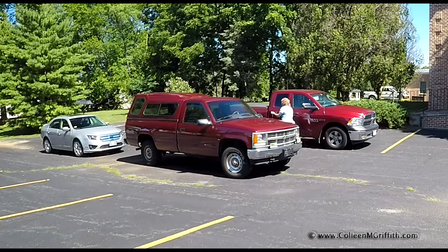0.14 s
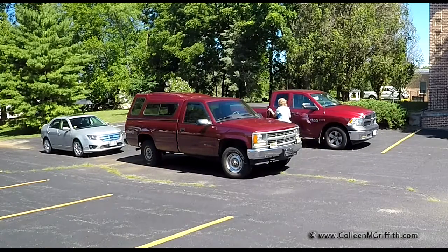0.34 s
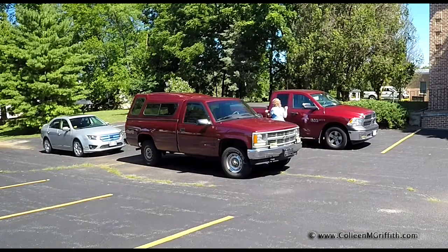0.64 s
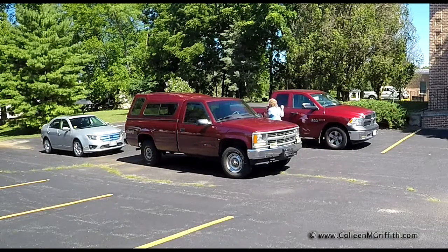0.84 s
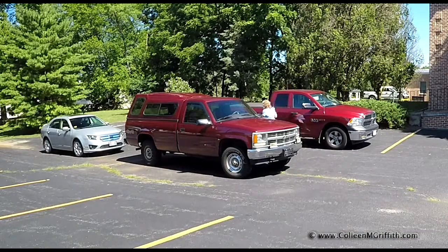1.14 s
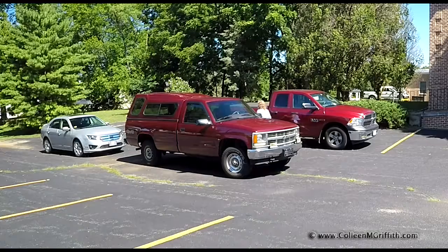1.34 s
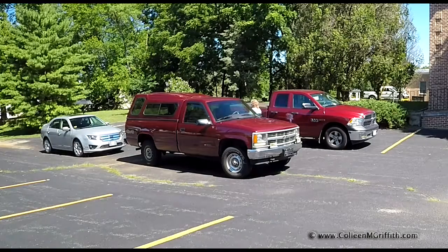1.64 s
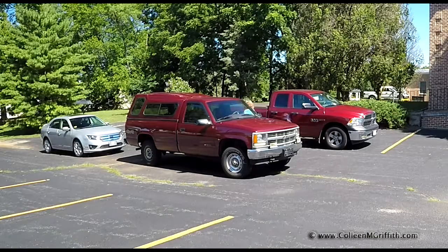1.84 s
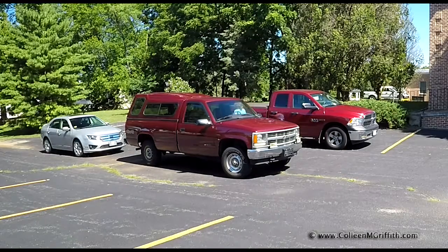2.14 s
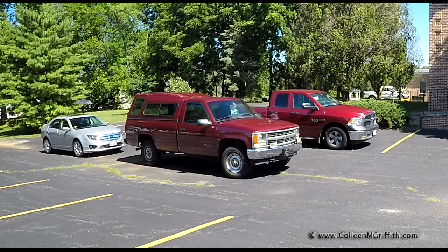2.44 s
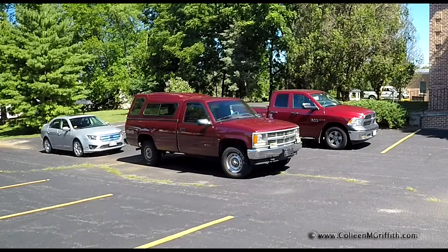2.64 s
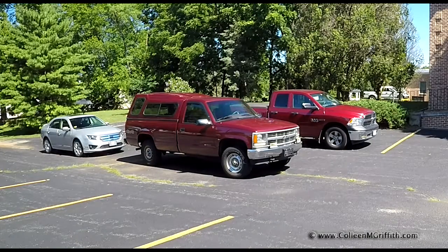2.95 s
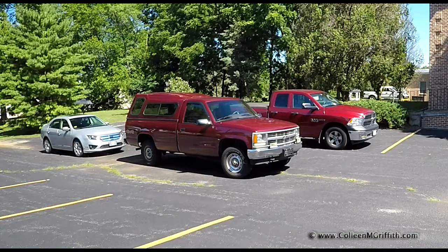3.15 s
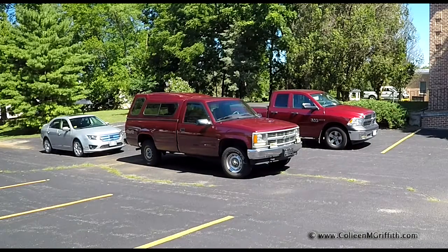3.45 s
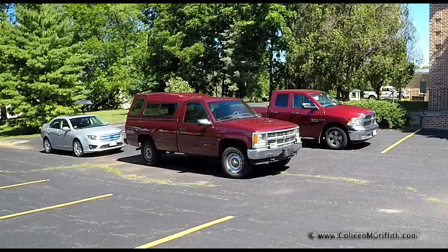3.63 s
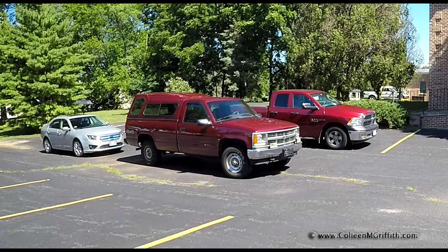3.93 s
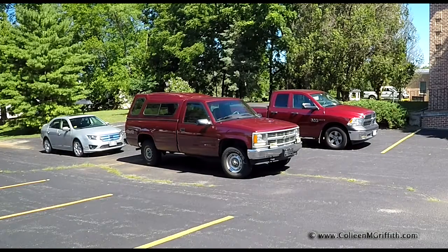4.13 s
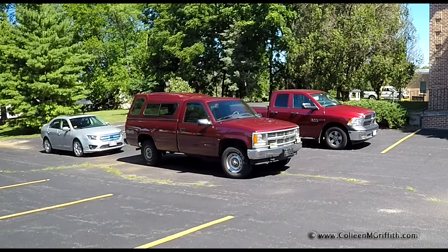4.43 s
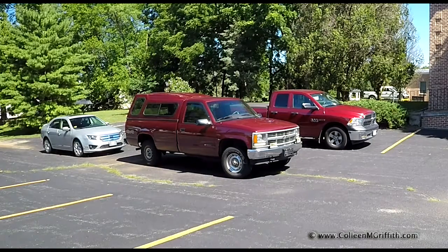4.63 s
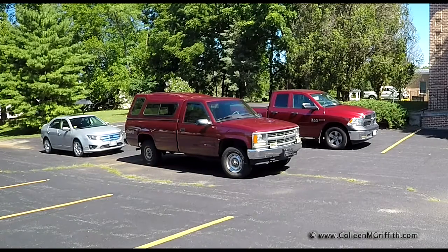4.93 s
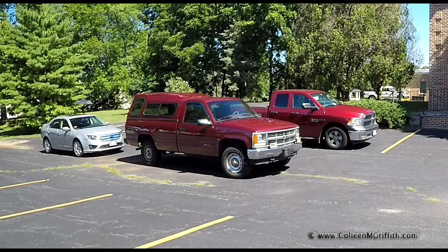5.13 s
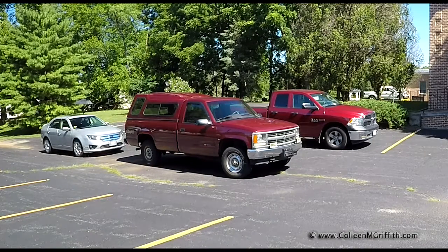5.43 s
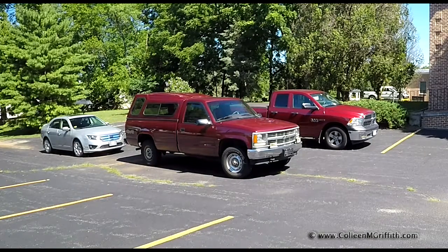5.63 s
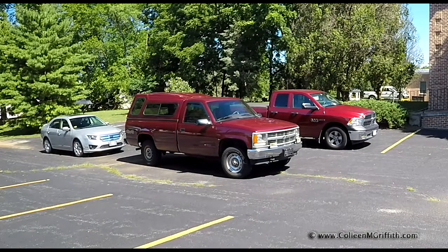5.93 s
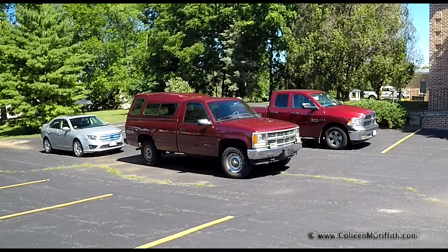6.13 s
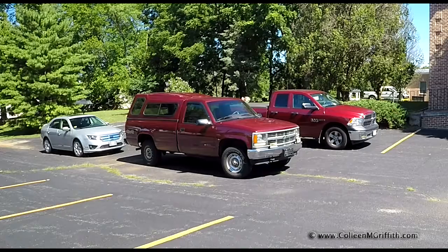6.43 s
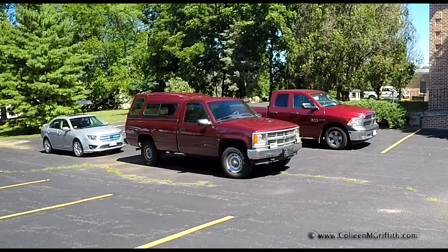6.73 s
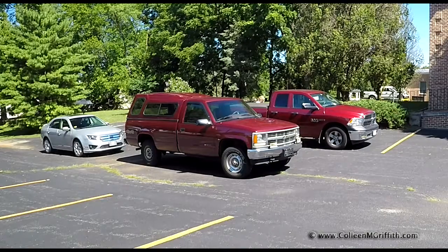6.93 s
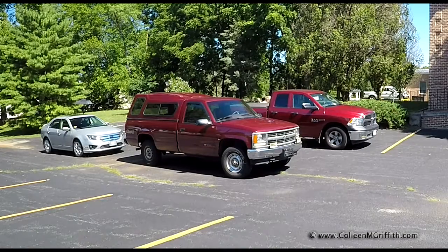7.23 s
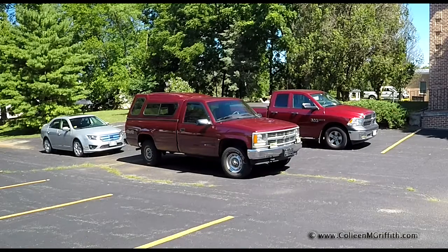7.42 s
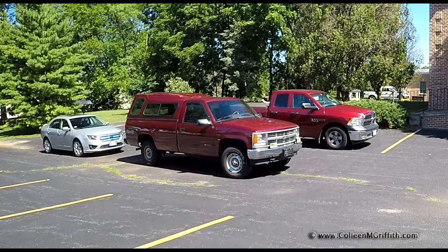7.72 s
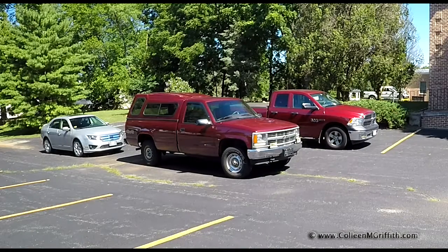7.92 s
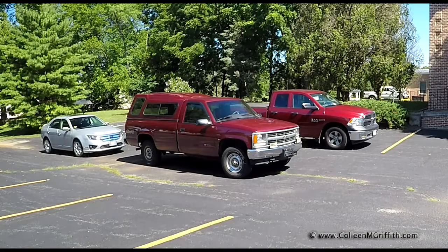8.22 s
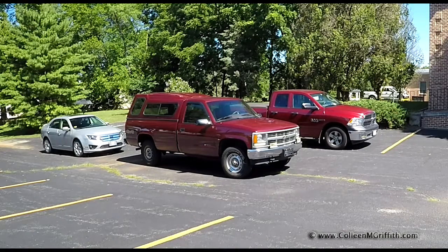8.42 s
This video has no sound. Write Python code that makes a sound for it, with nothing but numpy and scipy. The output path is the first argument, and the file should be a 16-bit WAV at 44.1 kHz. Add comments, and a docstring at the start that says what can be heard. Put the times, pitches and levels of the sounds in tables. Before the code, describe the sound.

A sunny parking lot heard in stereo from a camera, with steady soft hiss and a barely audible high whine on the right. Throughout, muffled traffic roars beyond the trees and an engine idles faintly with a fluttering low hum. Deep rumble is strong at 0.3 s, sinks by 3 s while far motors glide in low drones, then swells again to about 6 s. Nearby sparrows give short, sharp, zigzag chirps at 0.3, 1.2 and 1.9 s, then busier trilled and raspy groups at 3.2-3.6, 4.3, 5.2-5.5, 5.8-6 and 7.2 s, slightly left, with brief echoes. From about 5 s a vehicle's low exhaust note climbs unevenly, dropping in pitch after 6.9 s and fading after 7.3 s. Soft husky rising whistles come from distant birds at 6 and 7 s. Traffic rumble continues to the end at 8.6 s.

```python
"""A sunny parking lot, in stereo: an engine idles across the lot (orders of its firing rate) under camera hiss and whine.
From the start, traffic beyond the trees (shaped noise) rumbles, fades by 3 s and swells again, with gliding far motors.
Sparrows chirp nearby from 0.3 s on (zigzag whistles); parked cars, a brick wall and the trees throw the chirps back.
From about 5 s the exhaust note of a vehicle climbs, sinking after 6.9 s as its driver eases off.
Between 6 and 7.3 s soft husky whistles rise from birds far in the trees."""
import sys
import numpy as np
from scipy import signal
from scipy.fft import rfft, irfft
from scipy.io import wavfile
from scipy.ndimage import uniform_filter1d

SR = 44100
rng = np.random.default_rng(int(sys.argv[2]) if len(sys.argv) > 2 else 0)


def waveform_to_disk(signal):
    """Save audio, clipped to [-1, 1], as 16-bit WAV at the path in sys.argv[1]."""
    frames = np.transpose(np.atleast_2d(signal))
    scaled = np.clip(frames, -1, 1) * 32767
    samples = np.round(scaled).astype(np.int16)
    wavfile.write(sys.argv[1], SR, samples)


N = 377923
TIME = np.arange(N) / SR


def amp(db):
    """Decibels to gain."""
    return 10 ** (np.asarray(db) / 20)


def evened(x):
    """Scales to rms 1."""
    return x / np.sqrt(np.mean(x ** 2) + 1e-20)


def read(points, hz):
    """A table over frequency, joined on a log-frequency axis."""
    f, value = np.transpose(points)
    return np.interp(np.log(hz + 1), np.log(f), value)


def curve(rows, t=TIME):
    """The columns of a table, joined in time."""
    s, *columns = np.transpose(rows)
    return [np.interp(t, np.sort(s), c) for c in columns]


def drift(rate_hz):
    """Random wander of rms 1, its spectrum a bell that falls away above the rate."""
    hz = np.fft.rfftfreq(N, 1 / SR)
    return evened(irfft(rfft(rng.standard_normal(N)) * np.exp(-(hz / rate_hz) ** 2), N))


def tone(hz):
    """A sine of rms 1 that follows a pitch curve."""
    return np.sqrt(2) * np.sin(2 * np.pi * (np.cumsum(hz) / SR + rng.random()))


def glide(start_s, length_s, hz0, hz1):
    """A straight pitch glide and its arched gain, which is zero at both ends."""
    u = np.clip((TIME - start_s) / length_s, 0, 1)
    return hz0 + (hz1 - hz0) * u, np.sqrt(4 * u * (1 - u))


def pan(x, lean_db):
    """Places a sound between the two microphones by level, left minus right."""
    return x * amp(np.array([[lean_db], [-lean_db]]) / 2)


def scatter(delay_s, t60_s):
    """Sparse echoes of energy 1 that arrive after a delay and die away, different at each microphone."""
    t = np.arange(SR) / SR
    echoes_per_s = 2500
    hits = rng.random((2, SR)) < echoes_per_s / SR
    taps = rng.standard_normal((2, SR)) * hits * amp(-60 * t / t60_s) * (t > delay_s)
    return taps / np.linalg.norm(taps, axis=1, keepdims=True)


def add(mix, s, sound):
    """Mixes a stereo sound in at a time."""
    part = mix[:, round(s * SR):][:, :sound.shape[1]]
    part += sound[:, :part.shape[1]]


# likeness of the two microphones: (frequency [Hz], left-right likeness [-1 to 1])
LIKENESS = [(60, 1), (150, 0.98), (300, 0.97), (600, 0.89), (800, -0.064), (1100, -0.56), (1600, -0.32),
            (2400, -0.17), (3200, 0.53), (6000, -0.11), (14000, -0.061)]
# balance of the two microphones: (frequency [Hz], left minus right [dB])
LEAN = [(60, -0.5), (150, -0.5), (280, -2), (420, -3), (560, -7), (700, -12.5), (900, -5.5), (1300, -1.5),
        (2300, 0), (5500, 1.5), (9500, -2), (14000, 0)]
# sound that reaches the left microphone first: (frequency [Hz], share a quarter cycle ahead on the left)
LEAD = [(450, 0), (900, 0.26), (2000, 0.56), (3500, 0)]


def air_noise(spectrum, patchy_db):
    """Stereo noise, its mono mix of rms 1, whose colour shifts in small patches as the air moves."""
    hz = np.fft.rfftfreq(4096, 1 / SR)
    a, b, c, d, patches = rng.standard_normal((5, N // 1024 + 5, len(hz)))
    patches = uniform_filter1d(patches, size=5, axis=0)  # over time
    patches = evened(uniform_filter1d(patches, size=24, axis=1))  # over frequency
    same = np.clip(read(LIKENESS, hz), -.999, .999)
    lean = amp(read(LEAN, hz) / 2)
    left = a + 1j * b
    shared = same - 1j * read(LEAD, hz)
    own = np.sqrt(np.maximum(1 - abs(shared) ** 2, 0))
    right = shared * left + own * (c + 1j * d)
    # keeps the mono mix on the spectrum whatever the lean and likeness
    centre = np.sqrt(lean ** 2 + lean ** -2 + 2 * same)
    colour = amp(read(spectrum, hz) + patchy_db * patches)
    z = np.array([left * lean, right / lean]) / centre * colour
    x = signal.istft(z.transpose(0, 2, 1), nperseg=4096, noverlap=3072)[1][:, :N]
    return x / x.mean(0).std()


# colour of the microphone hiss: (frequency [Hz], relative level [dB per Hz])
HISS = [(100, -10), (2000, 3), (3400, 3.5), (5000, -0.5), (7700, 0), (8100, -0.5), (10000, -2), (11500, -8),
        (13000, -11.5), (14500, -20)]


def camera_hiss(level_db=-61.5):
    """Steady hiss of the microphones, with a patchy colour."""
    return amp(level_db) * air_noise(HISS, patchy_db=2.0)


def camera_whine(whine_hz=8545, level_db=-77.0, lean_db=-21.0):
    """Electronic whine, mostly on the right: a narrow noise band pulsing with the frame rate, and a steady line."""
    frame_hz, width_hz = 59.94, 70
    line_hz, line_share = 8631, .34
    hz = np.fft.rfftfreq(N, 1 / SR)
    resonance = 1 / (1 + ((hz - whine_hz) / width_hz) ** 2)
    band = evened(irfft(rfft(rng.standard_normal(N)) * resonance, N))
    turn = 2 * np.pi * frame_hz * TIME
    beat = 1 + .6 * np.cos(turn) + .3 * np.cos(turn / 2) + .15 * np.cos(3 * turn)
    whine = evened(band * beat) + line_share * tone(np.full(N, line_hz))
    return pan(amp(level_db) * whine, lean_db)


# colour of the traffic roar: (frequency [Hz], relative level [dB per Hz])
ROAR = [(60, -36), (150, -4), (250, -0.5), (340, -1.5), (420, -0.5), (520, -0.5), (620, -2.5), (730, -11),
        (950, -20), (1250, -24.5), (1800, -31), (2600, -40.5), (5000, -55), (15000, -72)]


def roar(level_db=-38):
    """Steady roar of the traffic beyond the trees: broad, patchy noise."""
    return amp(level_db) * air_noise(ROAR, patchy_db=1.4)


# level of the upper part of the tyre roar: (time [s], level [dB])
TYRES_DB = [(0, -54), (1.3, -53.5), (2.5, -52), (4, -50), (6.2, -49.5), (8.57, -50)]
# its colour: (frequency [Hz], relative level [dB per Hz])
TYRES = [(300, -40), (600, 1), (750, 0.5), (950, -3.5), (1300, -14), (2000, -20), (3000, -34), (8000, -65)]


def tyres():
    """Upper part of the tyre roar: noise that slowly gains level, brightening the traffic."""
    return air_noise(TYRES, patchy_db=1.14) * amp(curve(TYRES_DB)[0])


# brief surges in the traffic: (time of the peak [s], length [s], centre [Hz], peak level [dB])
SURGES = [(.35, .15, 600, -44), (3.91, .11, 530, -40.5), (4.3, .8, 260, -42), (5.07, .08, 700, -44),
          (6, .7, 112, -37), (7.26, .36, 520, -42.5)]
# colour of every surge: (multiple of its centre, relative level [dB per Hz])
SURGE = [(.5, -49), (.75, -1), (1, 9), (1.35, -18), (3.3, -60)]


def surges():
    """Brief surges in the traffic: bands of noise under bell-shaped swells."""
    out = np.zeros((2, N))
    for s, length, centre_hz, db in SURGES:
        spectrum = [(k * centre_hz, d) for k, d in SURGE]
        swell = np.exp(-((TIME - s) / (length / 2)) ** 2)
        out += amp(db) * swell * air_noise(spectrum, patchy_db=0)
    return out


# swell of the deep traffic rumble, before the trim in rumble(): (time [s], level [dB])
RUMBLE_DB = [(0, -35.5), (0.3, -28), (1.1, -33.5), (2, -42), (3.05, -50.5), (3.6, -39), (4.5, -34),
             (5.9, -31), (7.45, -37), (7.95, -31), (8.57, -33.5)]
# its colour: (frequency [Hz], relative level [dB per Hz])
RUMBLE = [(12, -11), (25, -5), (40, -4.5), (58, 1), (75, -3.5), (100, -4.5), (130, 0), (200, -12),
          (400, -63), (1500, -110)]
# engine hums that swell with it: (frequency [Hz], level relative to the rumble [dB])
RUMBLE_HUMS = [(58.5, -6), (100, -8)]


def rumble(trim_db=-2.0, hum_wander=0.012):
    """Deep traffic rumble: low noise that swells and fades, taking wavering engine hums along."""
    sound = air_noise(RUMBLE, patchy_db=0.0)
    for hz, db in RUMBLE_HUMS:
        gain = amp(db + 2 * drift(5.3))
        sound += pan(gain * tone(hz * (1 + hum_wander * drift(7.3))), read(LEAN, hz))
    return sound * amp(curve(RUMBLE_DB)[0] + trim_db)


# drones of far motors, before the trim in drones(): (start [s], end [s], start [Hz], end [Hz], level [dB])
DRONES = [(-0.5, 0.904, 87, 84.1, -30), (-1.5, 1.884, 148, 140.5, -32.5), (0.05, 1.87, 170, 167.2, -39),
          (1.63, 2.25, 450, 370, -43), (2.5, 2.76, 405, 402, -42.5), (1.5, 3.2, 169.2, 164, -36.5),
          (2.5, 3.06, 473, 477, -41.5), (2, 2.9, 580, 505, -53), (4.5, 5.8, 33, 36, -37.5),
          (5.5, 6.5, 37.2, 25.3, -41)]


def drones(trim_db=-1):
    """Far motors drift in and out of hearing, each a tone that glides a little."""
    out = np.zeros((2, N))
    for start, end, hz0, hz1, db in DRONES:
        hz, swell = glide(start, end - start, hz0, hz1)
        swell = swell * amp(db + trim_db + 1.5 * drift(4))
        out += pan(swell * tone(hz * (1 + .003 * drift(5))), read(LEAN, hz0))
    return out


# loudness of the vehicle's exhaust note: (time [s], level [dB])
EXHAUST_DB = [(4.75, -54.5), (5.1, -35.5), (5.45, -28), (5.83, -36.5), (5.9, -25), (6.14, -27.5),
              (6.19, -34), (6.26, -27), (6.55, -30.5), (6.78, -34), (7.03, -32), (7.12, -44.5),
              (7.175, -25), (7.27, -24), (7.55, -31.5), (7.8, -40.5), (8.0, -37), (8.57, -48)]


def exhaust(wander=0.0036, flutter_db=1.5, approach_db_per_s=55):
    """Firing note of a moving vehicle: it climbs under load and sinks when the driver eases off."""
    ease_s, top_hz, climb_hz_per_s = 6.94, 158.6, 7.2
    coast_hz, settle_s = 125.2, .8
    since = TIME - ease_s
    pull_hz = top_hz + climb_hz_per_s * since
    sink_hz = coast_hz + (top_hz - coast_hz) * np.exp(-abs(since) / settle_s)
    hz = np.where(since < 0, pull_hz, sink_hz)
    # rises steadily out of silence up to the first row of the table
    db = curve(EXHAUST_DB)[0] - approach_db_per_s * np.maximum(EXHAUST_DB[0][0] - TIME, 0)
    gain = amp(db + flutter_db * drift(14.0))
    return pan(gain * tone(hz * (1 + wander * drift(28.0))), -0.8)


# colour of the exhaust boom: (frequency [Hz], relative level [dB per Hz])
BOOM = [(60, -49), (105, -14), (130, -0.5), (155, 7), (185, 3), (220, 0), (280, -17), (500, -56),
        (1500, -110)]


def boom(level_db=-36, with_rumble=0.097, with_exhaust=0.1):
    """Exhaust boom: low noise that follows a share of the dB swing of the rumble and of the exhaust note."""
    rumble_db, note_db = curve(RUMBLE_DB)[0], curve(EXHAUST_DB)[0]
    swing_db = with_rumble * (rumble_db - rumble_db.mean())
    swing_db += with_exhaust * (note_db - note_db.mean())
    return air_noise(BOOM, patchy_db=1.0) * amp(level_db + swing_db)


# orders of the idling engine: (multiple of the firing rate, level [dB])
IDLE_ORDERS = [(2, -55.5), (3, -48), (4, -44.8), (5, -48.5), (6, -57.5), (8, -52), (9, -58)]


def idle(firing_hz=59.44, wander=0.00402, flutter_db=3.0):
    """Idling engine: orders of a wandering firing rate; each flutters on its way across the lot."""
    speed = firing_hz * (1 + wander * drift(2.78))
    out = np.zeros((2, N))
    for k, db in IDLE_ORDERS:
        gain = amp(db + flutter_db * drift(5.8))
        out += pan(gain * tone(round(k) * speed), read(LEAN, k * firing_hz))
    return out


# whistles far in the trees, before lot(): (time [s], length [s], start [Hz], end [Hz], level [dB])
WHISTLES = [(6.02, .16, 2380, 2520, -67), (6.975, .03, 3130, 3310, -65), (7.017, 0.068, 3140, 3410, -61.5),
            (7.072, 0.13, 3390, 3500, -59), (7.152, .093, 2730, 2790, -63)]


def far_birds(lean_db=-1.0):
    """Soft rising whistles from deep in the trees, made husky by a fast random quiver in pitch."""
    out = np.zeros(N)
    quiver = 1 + .042 * drift(350)
    for s, length, start_hz, end_hz, db in WHISTLES:
        hz, swell = glide(s, length, start_hz, end_hz)
        out += amp(db) * swell * tone(hz * quiver)
    return pan(out, lean_db)


# the kinds of note that the sparrows string into calls:
# (time into the note [s], pitch before the call's factor [Hz], level relative to the call [dB])
CHEEP = [(0, 3080, -10), (.006, 3550, -12), (.013, 4330, -11.5), (.03, 4430, -9), (.035, 3600, -9.5),
         (.042, 3430, -1), (.048, 4450, -6.5), (.053, 3900, -6), (.058, 3050, -10), (.068, 3080, -8),
         (.077, 3330, 2.5), (.084, 3580, -1), (.089, 3180, -1.5), (.096, 2800, -11)]
CHURP = [(0, 2890, -19), (.009, 3444, -8), (.014, 4200, 0.5), (.019, 4440, -1), (.037, 4390, -6),
         (.045, 4050, -0.5), (.052, 3150, -6)]
SWEEP = [(0, 2920, -4), (.007, 3514, 2), (.015, 4400, -2), (.021, 4754, 2), (.032, 4720, -5.5),
         (.038, 3340, 5.5), (.043, 3050, -9)]
PIP = [(0, 3020, -6), (.008, 3130, -3.5), (.018, 3544, 2), (.025, 3800, -4.5), (.034, 3140, -3)]
BUZZ = [(0, 5100, -7), (.012, 5390, -8.5), (.02, 5650, -4.5), (.026, 5870, -7)]
# the calls, before lot(): (time [s], note, pitch factor, level [dB], strain [0 has no trill or rasp],
# left minus right [dB], share of the energy scattered by leaves)
CHIRPS = [(.273, CHEEP, 1.005, -47.5, .15, 3, .45), (1.153, CHURP, 1, -55, .6, 6, .4),
          (1.213, BUZZ, 0.84, -58, 0.98, 4, .6), (1.24, PIP, 1, -56, 0.64, 0, .4),
          (1.254, SWEEP, 0.86, -59.5, 0.7, 2, 0.32), (1.9, CHEEP, 1.005, -46.5, 0.12, 3, .5),
          (3.227, CHURP, .95, -58.5, 0.78, 5, 0.48), (3.268, PIP, 0.95, -57, 0.62, -3, 0.84),
          (3.29, BUZZ, 1, -58, 0.69, 7, 0.66), (3.316, SWEEP, 0.97, -57, 0.52, 8, 0.7),
          (3.335, PIP, 0.98, -53.5, 0.43, 1, .6), (3.378, PIP, 0.95, -56.5, 0.48, 0, 0.54),
          (3.563, BUZZ, 1.03, -57.5, .7, 13, 0.27), (3.584, CHEEP, 1, -43.5, .18, 3, .3),
          (4.307, CHURP, 0.96, -52.5, 0.59, 6, 0.39), (4.368, BUZZ, 0.99, -55, .4, 14, .35),
          (4.394, SWEEP, .93, -52, 0.28, 2, 0.27), (4.463, PIP, 0.99, -59.5, .3, -1, .4),
          (5.174, BUZZ, 1.02, -59, 0.53, 17, 0.36), (5.199, CHEEP, 1.01, -44, .15, 4, .1),
          (5.284, BUZZ, 1.04, -53, .7, 16, 0.14), (5.312, CHURP, 1.02, -45, .6, 7, 0.11),
          (5.372, BUZZ, 1, -52, .9, 11, .4), (5.396, SWEEP, 0.97, -49.5, .45, 2, .15),
          (5.464, PIP, 0.99, -49, .35, 0, .12), (5.812, BUZZ, 1, -56.5, .7, 14, .3),
          (5.837, CHURP, 1.01, -48, 0.58, 6, .15), (5.89, PIP, .98, -55, 0.37, 2, .5),
          (5.9, BUZZ, .95, -54, .7, 11, 0.45), (5.924, SWEEP, 1.03, -51.5, 0.35, 5, .12),
          (5.995, PIP, .95, -53, .4, -2, 0.37), (7.178, CHURP, .985, -54, 0.53, 9, 0.64),
          (7.225, BUZZ, 0.94, -55, 1.4, 12, 0.52), (7.228, SWEEP, 0.87, -55, 0.84, 4, .7),
          (7.25, CHEEP, 0.98, -44, .4, 2, .25), (7.252, BUZZ, .95, -59, 1.1, 7, .6)]


def sparrows(flutter_db=2.0, rasp_hz=230, leaves_t60_s=0.12):
    """Each note is a whistle zigzagging in pitch; a fast trill and a rasp shake it, and nearby leaves blur it."""
    trill_hz, trill_swing_hz, trill_depth = 371.4, 280, 0.56
    edge_s = .002  # every note starts and stops abruptly
    out = np.zeros((2, N))
    trill = tone(trill_hz * (1 + 0.0986 * drift(38.2))) / np.sqrt(2)
    shake_hz = trill_swing_hz * trill + rasp_hz * drift(500)
    quiver = 1 + .014 * drift(250)
    flutter = amp(flutter_db * drift(90))
    for s, note, pitch, db, strain, lean_db, hidden in CHIRPS:
        t = np.arange(0, note[-1][0], 1 / SR)
        hz, note_db = curve(note, t)
        at = round(s * SR) + np.arange(len(t))
        edges = np.minimum(np.minimum(t, t[-1] - t) / edge_s, 1)
        # strain trills pitch and loudness together
        whistle = tone(hz * pitch * quiver[at] + strain * shake_hz[at])
        voice = evened(whistle * (1 + min(trill_depth * strain, 1) * trill[at]))
        voice = edges * amp(db + note_db) * flutter[at] * voice
        hidden = np.clip(hidden, 0, 1)
        leaves = np.sqrt(hidden) * scatter(.001, leaves_t60_s)[0, :SR // 10]
        leaves[0] = np.sqrt(1 - hidden)  # the direct path
        add(out, s, pan(signal.fftconvolve(voice, leaves), lean_db))
    return out


def lot(x, wall_db=-13, wall_s=.022, cars_db=-6.0, trees_db=-7.0):
    """Direct sound, quick scatter from parked cars, a slap from the wall, then the longer tail of the trees."""
    direct_db = -2
    cars = scatter(delay_s=.01, t60_s=.3)
    trees = scatter(delay_s=.035, t60_s=.7)
    response = amp(cars_db) * cars + amp(trees_db) * trees
    response[:, 0] += amp(direct_db)
    response[:, round(wall_s * SR)] += amp(wall_db)
    return signal.fftconvolve(x, response, axes=1)[:, :N]


def scene():
    """The camera's own noise, traffic, engines and the birds in the lot."""
    camera = camera_hiss() + camera_whine()
    traffic = roar() + tyres() + surges() + rumble() + boom()
    engines = drones() + exhaust() + idle()
    birds = lot(far_birds() + sparrows())
    return camera + traffic + engines + birds


def record(dry):
    """The band limit of the recorder, with a soft start and end."""
    edge_hz, fade_s = 14800, .004
    fade = np.minimum(np.minimum(TIME, TIME[-1] - TIME) / fade_s, 1)
    lowpass = signal.firwin(511, edge_hz, window=("kaiser", 9), fs=SR)
    return signal.oaconvolve(dry * fade, lowpass[None], "same")


dry = scene()
out = record(dry)
waveform_to_disk(out)
```